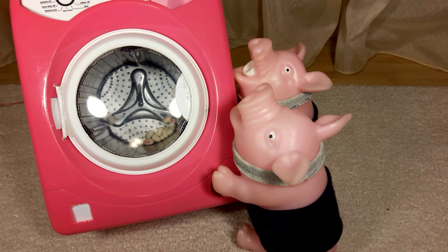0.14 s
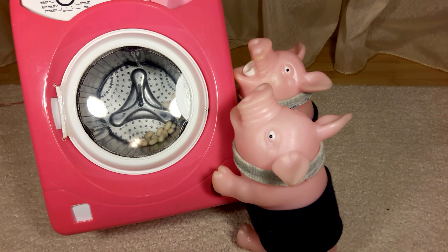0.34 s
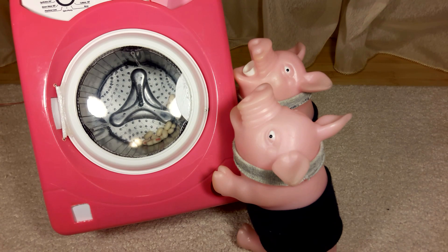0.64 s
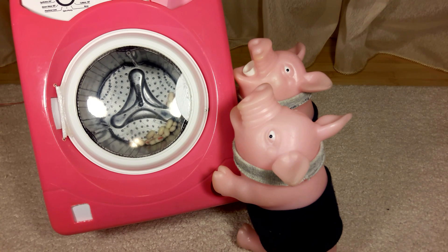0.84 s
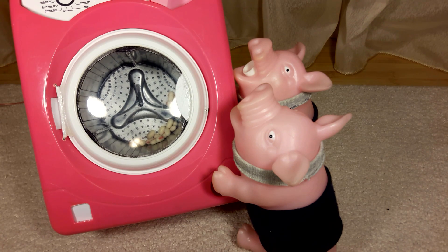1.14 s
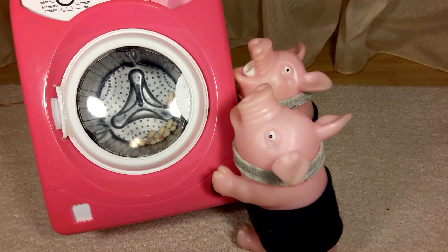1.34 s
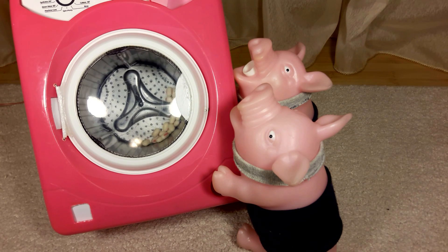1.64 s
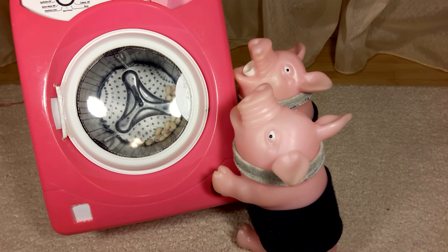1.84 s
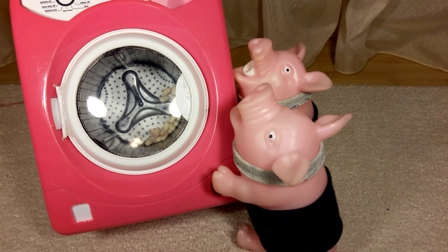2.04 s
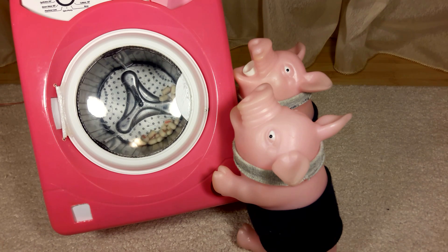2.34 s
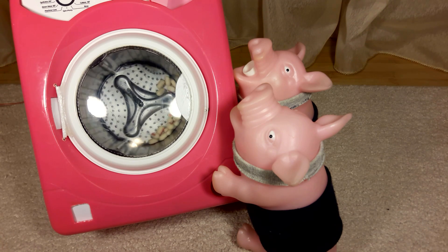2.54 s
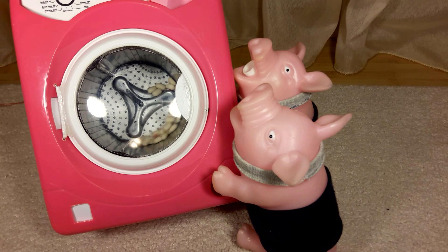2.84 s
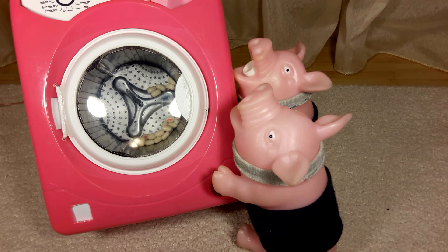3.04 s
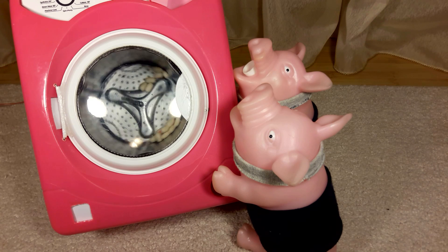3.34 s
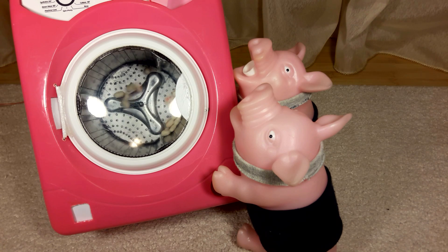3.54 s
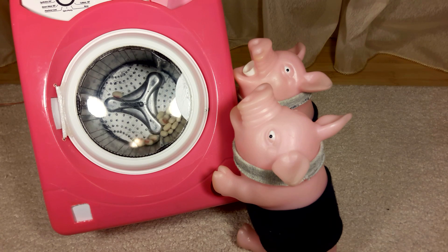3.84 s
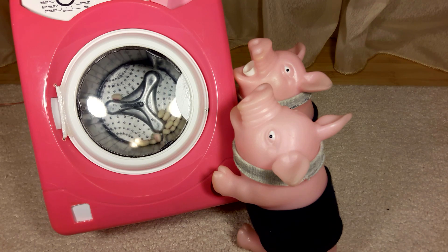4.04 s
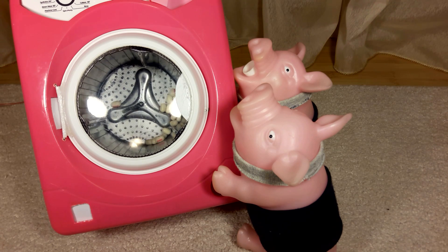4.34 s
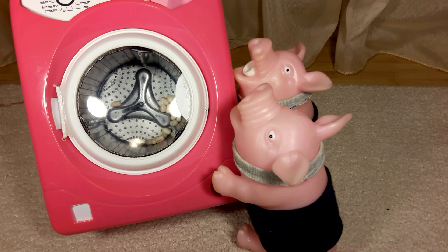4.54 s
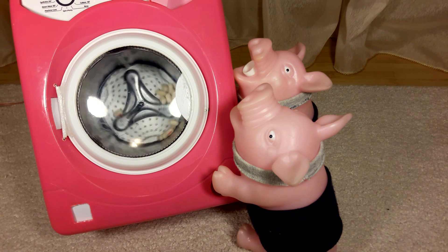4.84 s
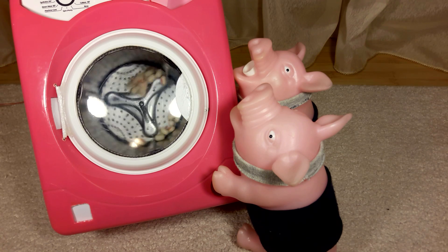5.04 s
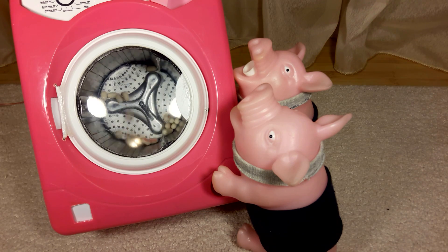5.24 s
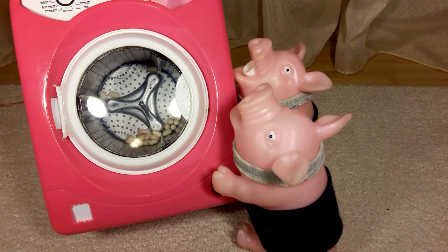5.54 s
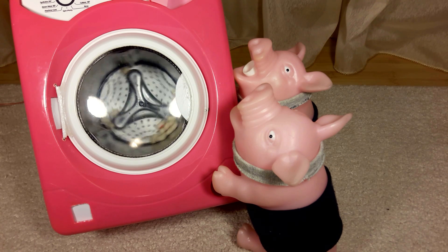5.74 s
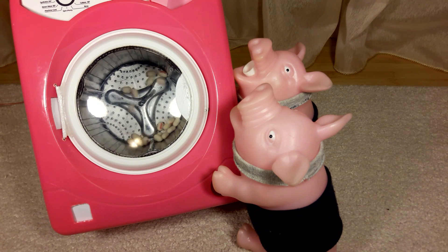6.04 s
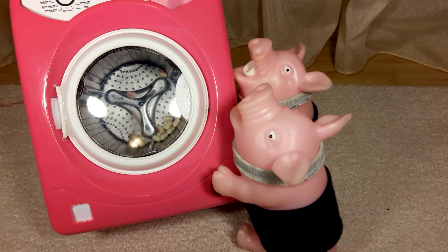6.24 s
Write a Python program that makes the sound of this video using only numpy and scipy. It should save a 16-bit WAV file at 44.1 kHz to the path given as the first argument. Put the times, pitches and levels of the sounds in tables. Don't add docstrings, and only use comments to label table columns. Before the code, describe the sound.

Small hard mints tumble in a hollow plastic toy drum, heard very close. It starts at once with a rattling burst, pauses with only faint ticks, gives two brief jerky clatters, then a longer, louder tumble that settles. After another pause come a fast, dense rattle and one more turn cut off at full strength. Dull housing knocks lie under bright clicks, over low room hum in a carpeted room.

```python
import sys
import numpy as np
from scipy import signal
from scipy.fft import rfft, irfft
from scipy.io import wavfile
from scipy.ndimage import uniform_filter1d

SR = 44100
rng = np.random.default_rng(int(sys.argv[2]) if len(sys.argv) > 2 else 0)


def bounce(signal):
    frames = np.transpose(np.atleast_2d(signal))
    limited = np.clip(frames, -1, 1)
    pcm = np.round(limited * 32767).astype(np.int16)
    wavfile.write(sys.argv[1], SR, pcm)


def gain_from_decibels(decibels):
    exponent = np.asarray(decibels, float) / 20
    return 10 ** exponent


N = 281799

# (frequency [Hz], density [dB per Hz])
HUM = [(40, -19), (52, -2.5), (65, -2), (90, -10), (140, -6), (280, -4.5), (400, -12), (700, -10.5),
       (1250, -12), (2500, -21.5), (7000, -34.5), (10000, -35.5), (13000, -27.5), (16000, -31)]
# (frequency [Hz], correlation [0-1])
HUM_SAME = [(40, .7), (130, .9), (300, .9), (600, .6), (1600, .15), (5000, 0)]
# (frequency [Hz], left minus right [dB])
HUM_LEAN = [(60, 4.5), (600, 2), (5000, 2), (15000, -1.5)]
HUM_DB, HUM_RISE_DB_PER_S = -55.5, 1
# (time [s], frequency [Hz], level [dB])
DRONE = [(0, 129.8, -73), (4.25, 131.1, -65.5), (4.319, 177, -59), (4.52, 177, -56), (4.6, 135, -66.5),
         (5.55, 130, -61), (5.7, 130.4, -60.5), (6.39, 128.4, -58.5)]
# (start [s], end [s], frequency [Hz], width [Hz], level [dB])
RUBS = [
    (0.003, 0.022, 2210, 90.1, -57),
    (2.72, 2.803, 2150, 60.2, -64),
    (3.368, 3.465, 325, 67.4, -49.5),
    (3.484, 3.568, 430, 39.7, -50.5),
    (5.182, 5.297, 8620, 59, -34),
]

# (time [s], blow [dB], share on the door [dB], share on the
# rim [dB])
LANDINGS = [(0.0404, -29.5, -7, -36), (0.0504, -10, -27.5, -20.5), (0.0654, -17, -10, -28.5),
            (0.0836, -20, -16.5, -37.5), (0.0918, -12.5, -21, -18.5), (0.107, -13, -24, -20.5),
            (0.1425, -8, -12, -13.5), (0.162, -17.5, -18.5, -20.9), (0.1679, -21, -14, -15.5),
            (0.2028, -5.5, -20, -23), (0.2257, -10, -8, -22.5), (0.262, -15, -19.5, -21.5),
            (0.2752, -15, -17.5, -25), (0.29, -17.5, -14.5, -15), (0.3154, -10.5, -20, -18),
            (0.33, -29.5, -5.5, -21), (0.3397, -13, -8, -15), (0.351, -13.5, -20.5, -18.5),
            (0.362, -12.5, -19.5, -26.5), (0.3785, -11.5, -13.5, -17), (0.394, -10.5, -33, -15),
            (0.4029, -8, -14.5, -20), (0.4148, -9, -13, -13), (0.4417, -12, -14.5, -22),
            (0.4495, -15, -6, -24), (0.4557, -13, -16.5, -24.7), (0.4744, -13.5, -4.5, -15.5),
            (0.5034, -17, -13, -20), (0.5191, -30, -9, -22.2), (0.5233, -17.5, -9, -19.6),
            (0.534, -25, -25, -23.9), (0.546, -23, -17, -25), (0.5539, -24, -8, -16),
            (0.5628, -28, -15, -16), (0.5769, -28, 1, -12), (0.5908, -17.5, -8, -21.5),
            (0.6185, -29, -23, -29.5), (0.634, -39.5, -6, -27),
            (1.698, -34.5, -18.5, -27), (1.9909, -29.5, -7.5, -20.6), (2.0044, -15.5, -13, -18.5),
               (2.0299, -12, -11, -22), (2.042, -29, -17, -23.5), (2.054, -50, -14.4, -19.5),
               (2.0622, -50, -13, -16), (2.0722, -15, -12.5, -18.5), (2.0894, -33, -9, -20.6),
               (2.123, -9, -7, -18), (2.141, -22, -19, -25.0), (2.1504, -15, -4, -23),
               (2.164, -24, -21, -21.1), (2.186, -8, -25, -19.5), (2.2008, -20, -17, -17),
               (2.212, -24, -9, -22.7), (2.2232, -22, -16.8, -26.1), (2.2547, -22, -12, -23),
               (2.2675, -24.3, -7, -27), (2.2839, -19.5, -6, -22.7), (2.8101, -10.5, -13.5, -20),
               (2.8345, -34, -4, -10), (2.8425, -11, -15, -15), (2.8633, -10.5, -10, -20),
               (2.8737, -15.5, -7, -11), (2.9202, -14.5, -4.5, -17), (2.9362, -8.5, -16, -17.5),
               (2.9642, -18.5, 0, -34), (2.9857, -29, -5, -25), (2.997, -21, -13.1, -24),
               (3.0099, -18, -18.7, -30), (3.0315, -19.5, -4, -33), (3.0603, -34, -13, -32),
               (3.068, -44, -16.1, -22),
            (3.5639, -22, -12, -24), (3.5916, -29, -3, -29), (3.5987, -30, -3, -25.3),
             (3.6074, -38, -1, -28), (3.6232, -38, -5, -31), (3.633, -17.5, -12, -16),
             (3.6553, -8, -24, -15.5), (3.6643, -16, -31, -21), (3.6797, -11.5, -9.5, -18),
             (3.7001, -9.5, -15, -13.5), (3.7136, -15, -5, -25), (3.7352, -3, -28, -19.5),
             (3.74, -10, -14, -23), (3.7597, -11, -10, -28), (3.767, -12.5, -27, -23),
             (3.7849, -5.5, -35, -16.5), (3.79, -9.5, -16, -19), (3.803, -5, -19, -19),
             (3.811, -8.5, -8.5, -22.5), (3.8232, -9.5, -24, -16), (3.846, -4, -24, -19.5),
             (3.8625, -13, -30, -22.5), (3.8723, -6.5, -31, -18), (3.8816, -8, -15, -16),
             (3.8918, -12, -12.6, -12), (3.902, -8, -31, -16.5), (3.9313, -10, -28, -20),
             (3.9412, -14.5, -26, -25), (3.9503, -22.5, -17, -17.5), (3.9554, -16.5, -30, -15),
             (3.9708, -16, -27, -28), (3.9818, -16, -15, -19), (3.9922, -22, -11, -15),
             (4.0052, -34, -17, -23.6), (4.0128, -22, -9, -26.6), (4.0315, -37, -10, -22.7),
            (4.058, -18.5, -10.5, -21.5), (4.0784, -18.5, -14, -24), (4.1135, -38, 1, -23.9),
            (4.1318, -33, -1, -16), (4.1445, -36, 2, -23), (4.1648, -15.5, -26.0, -28),
            (4.1972, -11, -26, -18.5), (4.229, -16, -29, -17), (4.2422, -23, -30, -22),
            (4.2639, -16, -16, -21), (4.441, -29.5, -3, -21.9), (4.4486, -33, -20, -29),
            (4.456, -37, -14, -25), (4.5543, -17.5, -14, -18.5), (4.5737, -44, -15, -22.5),
            (4.5913, -36, -22, -31.9), (4.6059, -31, -6, -31), (4.6134, -32.5, -6.5, -30),
            (4.956, -43, -8, -27.4), (4.9636, -20.5, -22, -25), (4.9717, -35, -17, -7),
             (4.9874, -18.5, -12, -22), (5.0007, -38, -14, -24.0), (5.015, -13.5, -10, -20),
             (5.0246, -12, -24, -16), (5.0352, -16.5, -9, -15), (5.0452, -14, -28, -20.7),
             (5.0586, -18, -24, -13), (5.0859, -12, -32, -26), (5.0979, -9.5, -35, -15.5),
             (5.1122, -14, -29, -17), (5.1264, -20, -14, -22), (5.1356, -25, -9, -25),
             (5.1477, -8, -22, -15.5), (5.1608, -12.5, -18, -9), (5.17, -9, -26, -27),
             (5.1876, -7, -18, -23), (5.2046, -11, -11, -7.5), (5.2444, -12, -9, -21),
             (5.2565, -7, -12, -13.5), (5.2699, -5, -20.5, -20), (5.2839, -37, -17, -23),
             (5.292, -10.5, -11.5, -19.5), (5.3029, -7, -22, -10), (5.3142, -5.5, -25.5, -21),
             (5.3239, -8.5, -19, -15), (5.3363, -9, -15, -14.5), (5.346, -6.5, -21, -15),
             (5.3572, -15, -23, -16), (5.3789, -2.5, -21, -21.5), (5.3989, -5.5, -18.5, -18),
             (5.4079, -15.5, -24, -20.4), (5.414, -20, -23, -6), (5.425, -16, -20, -15.5),
             (5.4311, -17.5, -13, -11), (5.451, -11.5, -25, -17.5), (5.467, -13.5, -14.5, -13),
             (5.4958, -5, -35, -16.5), (5.5181, -5, -33, -16.5), (5.5332, -11, -17.5, -18),
             (5.5437, -16.5, -3, -21), (5.5524, -28, -21, -22.6), (5.5636, -13, -24, -25),
             (5.5864, -9.5, -8.5, -22), (5.61, -24, -15, -21.5), (5.6173, -24, -18, -23.9),
             (5.6337, -17.5, -6.5, -25.4), (5.6546, -16.5, -10, -15),
            (5.9103, -27.5, -17, -24), (5.92, -29, -3, -20), (5.9446, -32, -1, -26.0),
             (5.9529, -31.5, -12, -19), (5.963, -21, -4, -21), (5.982, -16, -20, -28),
             (5.9945, -5.5, -24, -16), (6.0143, -10.5, -23, -21.4), (6.02, -11.5, -9.5, -17),
             (6.04, -6, -26, -16.5), (6.065, -6.5, -16, -15), (6.0778, -5.5, -25, -16.5),
             (6.0921, -12.5, -20, -11), (6.099, -10, -24, -18), (6.115, -10, -21, -22),
             (6.1246, -15, -13, -24), (6.1325, -13, -18, -18), (6.142, -18, -20, -16),
             (6.1468, -13, -23, -12.5), (6.1706, -15, -12, -13), (6.1778, -21, -11.1, -19.7),
             (6.1968, -20.5, -5, -13), (6.2108, -7, -7.5, -14), (6.2295, -10, -28, -19),
             (6.252, -3, -13, -19), (6.285, -5.5, -16, -14), (6.2944, -11.5, -15, -18.7),
             (6.3252, -11, -10, -17.5), (6.3479, -19.5, -11.9, -17.3), (6.3543, -28, -14, -19.2),
             (6.37, -16, -12, -11), (6.3756, -9, -10, -16.3)]
# (time [s], patter level [dB])
SLIDES = [
    [(0.0, -68), (0.045, -44), (0.06, -31.5), (0.19, -38), (0.31, -40), (0.33, -34), (0.5, -28),
     (0.64, -47.5), (0.68, -82)],
    [(1.99, -68), (2.06, -51), (2.12, -43), (2.2, -24.5), (2.3, -43), (2.35, -72)],
    [(2.81, -64), (2.86, -22.5), (2.9, -29), (2.95, -21.5), (3.02, -29), (3.11, -61.5)],
    [(3.5, -60), (3.56, -43.5), (3.62, -34), (3.73, -21), (3.8, -30), (3.88, -18), (3.95, -22.5),
     (4.01, -42), (4.045, -55)],
    [(4.046, -56), (4.09, -39), (4.15, -57), (4.21, -38), (4.28, -46.5), (4.35, -65)],
    [(4.52, -59), (4.57, -49), (4.65, -63)],
    [(4.87, -66.5), (5.06, -24.5), (5.2, -20.5), (5.35, -19.5), (5.372, -27), (5.39, -20.5), (5.54, -26),
     (5.67, -56), (5.72, -69)],
    [(5.87, -49.5), (5.93, -56), (6.01, -19.5), (6.15, -22), (6.2, -32.5), (6.26, -19.5), (6.36, -30),
     (6.385, -11)],
]
# (time [s], blow [dB], share on the rim [dB])
STRAYS = [
    (.1375, -12.5, -20),
    (.1982, -21, -24),
    (.7705, -57, -5),
    (1.1135, -54, -7),
    (1.861, -60, -6.5),
    (2.3565, -41, -26),
    (2.6305, -49, -26),
    (4.6683, -37, -24),
]
# (time [s], knock [dB], tick [dB])
KNOCKS = [(0.7696, -63, -1), (0.829, -47, -18), (1.1194, -61.5, -16), (1.1333, -51, -8), (1.1794, -57, -14),
          (1.5288, -58, -8), (1.5483, -51, -12), (1.6013, -47, -27), (1.863, -61.5, 1.5),
          (2.3944, -59.5, -7.5), (2.4196, -46, -18), (2.474, -48.5, -18), (2.505, -50, -18),
          (2.618, -47, -17), (3.2271, -49.5, -16.5), (3.2544, -46.5, -18.5), (3.3094, -49, -16),
          (3.376, -41.5, -22), (3.3984, -38, -19), (3.419, -52, -14), (3.5058, -52, -19), (3.5236, -54, 5),
          (4.7785, -46.5, -25), (4.7995, -49, -20), (4.8304, -50, -24), (4.8778, -47, -30),
          (4.8974, -39, -28), (4.9194, -38.5, -26), (5.77, -42.5, -18), (5.868, -44.5, -21)]

# (frequency [Hz], width [Hz], level [dB])
HOUSING = [(177, 35, -8.5), (284, 25, -4), (336, 45, -2), (430, 17, -7), (731, 140, -13), (1696, 72, -9.5)]
# (frequency [Hz], width [Hz], level [dB])
PANELS = [(555.2, 46.3, -5.5), (1197.6, 63.4, -4.5)]
# (time [s], side panel level [dB], top panel level [dB])
GRIP = [(0, -3, -14), (.2, 4, -0.5), (.6, -0.5, -9), (2.0, -2.5, -13.5), (2.2, -1, -3.5), (2.85, -2, -5),
        (3.05, 7.5, -3), (3.599, -7, -19), (3.81, 9, 7), (3.95, 1.5, 1.5), (4.5, -5, -7.5), (5.1, 2, -2),
        (5.16, 8, -13), (5.24, 2, -12), (5.29, 4.5, 5), (5.54, 3, -0.5), (6.0, 1.5, -7), (6.39, -3.5, -2)]
# (frequency [Hz], width [Hz], level [dB])
CAVITY = [(2151, 55, -3), (2198, 69, -3), (2516, 67, -16)]
# (frequency [Hz], width [Hz], level [dB])
WALL = [(2660, 46, -27), (2830, 34, 0.5), (3866, 66, 1.5), (4050, 93, -23), (4875, 120, 2.5), (5320, 85, 3),
        (6030, 120, -3), (6820, 110, -6)]
# (frequency [Hz], width [Hz], level [dB])
RIM = [(8300, 50, -5.5), (8620, 58, -5.5), (8880, 80, -6), (9950, 110, -5.5)]
# (frequency [Hz], width [Hz], level [dB])
AXLE = [(430, 17, -13), (727, 64, 0.5), (1140, 43, 4.5), (1645, 48, 1), (2160, 80, -2.5), (2810, 120, -2.5),
        (3250, 310, -10.5)]
# (frequency [Hz], density [dB per Hz])
CLATTER = [(800, -45.5), (1450, -33.5), (1900, -7), (2600, -8), (3800, 0.5), (5000, -5), (6300, -2.5),
           (7200, -11.5), (8800, -16.5), (9300, -23), (10200, -17.5), (13000, -19), (16000, -24)]
# (frequency [Hz], time to fall by 60 dB [s])
CLATTER_T60 = [(1500, 0.14), (2500, 0.15), (5000, 0.051), (9000, 0.051), (15000, 0.046)]
# (frequency [Hz], correlation [0-1])
SAME = [(100, .98), (400, .97), (1200, .7), (2500, .6), (5000, .1), (12000, 0)]
# (frequency [Hz], left minus right [dB])
LEAN = [(200, 0.5), (1000, 2.5), (2500, 2), (5000, 3), (7000, 2.5), (8600, -12), (10500, -2), (14000, -2)]

BOUNCES, SPOTS, SLIPS = 5, 6, 8
PATTER_PER_S = 600
THUD_DB, THUD_PER_BLOW, THUD_LIMIT_DB = -28.5, 0.37, -11.5
SLIDE_BRIGHT_DB, SLIDE_BRIGHT_PER_DB = -13, 0.25
SLIDE_THUD_DB, SLIDE_THUD_PER_DB = -10.5, -0.53
SPOT_COLOUR_DB = 2.5
BRIGHT_DB = 12.5


def evened(x):
    return x / np.sqrt(np.mean(x ** 2) + 1e-20)


def smoothed(x, size):
    return uniform_filter1d(uniform_filter1d(x, size=size), size=size)


def read(points, hz):
    f, value = np.transpose(points)
    return np.interp(np.log(hz + 1), np.log(f + 1), value)


def pair(a, b, same, lean_db):
    same = np.clip(same, -1, 1)
    right = same * a + np.sqrt(1 - same ** 2) * b
    return np.array([a * gain_from_decibels(lean_db / 2), right * gain_from_decibels(-lean_db / 2)])


def clicks(s, size):
    return np.bincount(np.clip(np.round(s * SR).astype(int), 0, N - 1), size, N)


def resonance(hz, width):
    r = np.exp(-np.pi * width / SR)
    return r, [1, -2 * r * np.cos(2 * np.pi * hz / SR), r * r]


def ring(s, size, modes, sharper, mode_db, through_frame=False):
    out = np.zeros((2, N))
    for hz, width, db in modes:
        a, b = rng.standard_normal((2, len(s)))
        a = np.sign(a) * np.sqrt(abs(a)) * 1.18
        r, poles = resonance(hz, width / sharper)
        blows = pair(a, b, read(SAME, hz), read(LEAN, hz)) * size * gain_from_decibels(db + mode_db) * width / 100
        trains = [clicks(s, v) for v in blows]
        rung = signal.lfilter([0, np.sin(2 * np.pi * hz / SR)], poles, trains)
        if through_frame:
            rung = signal.lfilter((1 - r * r) / 2 * np.array([1, 0, -1]), poles, rung)
        out += rung
    return out


def room(patchy_db=1.1):
    frames, hz = N // 256 + 5, np.fft.rfftfreq(1024, 1 / SR)
    a, b, c, d, patches = rng.standard_normal((frames, 513, 5)).T
    patches = uniform_filter1d(patches, size=14, axis=0)
    patches = evened(uniform_filter1d(patches, size=16, axis=1))
    z = pair(a + 1j * b, c + 1j * d, read(HUM_SAME, hz)[:, None], read(HUM_LEAN, hz)[:, None])
    z = z * gain_from_decibels(read(HUM, hz)[:, None] + patchy_db * patches)
    noise = evened(signal.istft(z, nperseg=1024, noverlap=768)[1][:, :N])
    level_db = HUM_DB + HUM_RISE_DB_PER_S * (np.arange(N) - N / 2) / SR
    return gain_from_decibels(level_db) * noise


def drone(unsteady=0.22):
    s, *columns = np.transpose(DRONE)
    hz, db = (np.interp(np.arange(N) / SR, s, c) for c in columns)
    waver = 1 + unsteady * evened(smoothed(rng.standard_normal(N), 2500))
    tone = np.sin(2 * np.pi * np.cumsum(hz) / SR)
    return np.sqrt(2) * gain_from_decibels(db + np.array([[.7], [-.7]])) * waver * tone


def rubs():
    out = np.zeros((2, N))
    for start, end, hz, width, db in RUBS:
        length = round((end - start) * SR)
        friction = rng.standard_normal(SR)[:length]
        tone = signal.lfilter([1], resonance(hz, width)[1], friction)
        tone = evened(tone) * gain_from_decibels(db) * signal.windows.tukey(length, .5)
        out[:, round(start * SR):][:, :length] += pair(tone, tone, 1, read(LEAN, hz))
    return out


def landings(handful_ms=6.5):
    rows = LANDINGS
    s, blow_db, cavity_db, bright_db = np.transpose(rows)
    housing_db = np.minimum(THUD_DB + (THUD_PER_BLOW - 1) * blow_db, THUD_LIMIT_DB)
    lag = rng.random((len(s), BOUNCES)) * (np.arange(BOUNCES) > 0)
    many = np.clip(1 + blow_db / 22, .05, 1)[:, None]
    share = np.where(lag > 0, 0.75 * many, 1) * (0.55 + 0.64 * rng.random(lag.shape))
    parts_db = np.array([housing_db + 6.5, cavity_db + 9.5, 0 * s, bright_db + BRIGHT_DB])
    sizes = gain_from_decibels(blow_db + parts_db - 8.5)[:, :, None] * share
    times = s[:, None] + lag * many * handful_ms / 1000
    return times.ravel(), sizes.reshape(4, -1)


def patter():
    t = np.sort(rng.random(round(PATTER_PER_S * N / SR))) * N / SR
    heap = np.full(len(t), -200.)
    for rows in SLIDES:
        u, db = np.transpose(rows)
        inside = (t >= u[0]) & (t <= u[-1])
        heap[inside] = np.interp(t[inside], u, db)
    heap_db = heap + 2.7 * np.minimum(rng.exponential(1, len(t)), 4) - 10.5
    thud_db = SLIDE_THUD_DB + SLIDE_THUD_PER_DB * (np.maximum(heap, -70) + 25)
    bright_db = 5 + SLIDE_BRIGHT_DB + SLIDE_BRIGHT_PER_DB * (heap + 25)
    return t, gain_from_decibels(heap_db + np.array([thud_db, 0 * t - 3, 0 * t, bright_db]))


def clatter(s, sizes, clatter_db=-4.0, rise_ms=0.76, crack=0.94, crack_ms=1.4):
    t, out = np.arange(4096) / SR, np.zeros((2, N))
    spot = rng.integers(0, SPOTS, len(s))
    hz, frame = np.fft.rfftfreq(128, 1 / SR), np.arange(4096 // 32 + 1) * 32 / SR
    fine = np.fft.rfftfreq(4096, 1 / SR)
    decay = gain_from_decibels(-60 * frame / read(CLATTER_T60, hz)[:, None])
    edges = [fine < 7300, fine >= 7300]
    for k in range(SPOTS):
        a, b = rfft(rng.standard_normal((2, 4096)))
        colour = gain_from_decibels(read(CLATTER, fine)) / np.sqrt(read(CLATTER_T60, fine) / .05)
        colour = colour * gain_from_decibels(SPOT_COLOUR_DB * evened(smoothed(rng.standard_normal(len(fine)), 50)))
        z = pair(a, b, read(SAME, fine), read(LEAN, fine)) * colour
        for edge, size in zip(edges, sizes[2:]):
            band = signal.stft(evened(irfft(z * edge)), nperseg=128, noverlap=96)[2]
            burst = signal.istft(band * decay, nperseg=128, noverlap=96)[1]
            burst = burst * (1 - np.exp(-t * 1000 / rise_ms))
            burst = burst * (1 + crack * np.exp(-t * 1000 / crack_ms))
            blows = clicks(s, size * (spot == k))[None]
            out += signal.oaconvolve(blows, burst, axes=1)[:, :N]
    return gain_from_decibels(clatter_db) * out


def strays():
    s, blow_db, bright_db = np.transpose(STRAYS)
    sizes = gain_from_decibels(blow_db - 9.0 + np.array([0 * s, 0 * s, 0 * s, bright_db + BRIGHT_DB]))
    return clatter(s, sizes) + ring(s, sizes[1], CAVITY, sharper=3.1, mode_db=1)


def axle():
    s, knock_db, tick_db = np.repeat(KNOCKS, SLIPS, axis=0).T
    s = s + .011 * rng.random(len(s)) ** 2
    tick = ring(s, gain_from_decibels(knock_db + tick_db), WALL[3:], sharper=0.45, mode_db=-7.0)
    return ring(s, gain_from_decibels(knock_db), AXLE, sharper=1.0, mode_db=-10.5) + tick


def drum(low_hz=130):
    landing_s, landing_sizes = landings()
    patter_s, patter_sizes = patter()
    s = np.r_[landing_s, patter_s]
    sizes = np.c_[landing_sizes, patter_sizes]
    out = ring(s, sizes[0], HOUSING, sharper=0.66, mode_db=9.5, through_frame=True)
    u, *free_db = np.transpose(GRIP)
    for panel, db in zip(PANELS, free_db):
        size = sizes[0] * gain_from_decibels(np.interp(s, u, db))
        out += ring(s, size, [panel], sharper=0.75, mode_db=10.0, through_frame=True)
    out += ring(s, sizes[1], CAVITY, sharper=2.1, mode_db=0.0)
    out += ring(s, sizes[2], WALL, sharper=0.93, mode_db=-6.5)
    out += ring(s, sizes[3], RIM, sharper=1.5, mode_db=-11.5)
    out += clatter(s, sizes) + axle()
    return signal.sosfilt(signal.butter(2, low_hz, "high", fs=SR, output="sos"), out)


def reflections(x, t60=0.18, wet_db=-16, dull_hz=9000):
    t = np.arange(SR // 3) / SR
    taps = rng.choice([-1., 1.], (2, len(t))) * (rng.random((2, len(t))) < .05) * (t > .004)
    taps = signal.lfilter([1], [1, -np.exp(-2 * np.pi * dull_hz / SR)], taps * gain_from_decibels(-60 * t / t60))
    return gain_from_decibels(wet_db) * signal.fftconvolve(x, taps / np.linalg.norm(taps[0]), axes=1)[:, :N]


def scene():
    toy = drum() + rubs()
    return toy + reflections(toy) + drone() + room() + strays()


def low_pass(x):
    return signal.sosfilt(signal.butter(12, 16510, fs=SR, output="sos"), x)


def record(dry):
    edge = signal.firwin(301, 15750, window=("kaiser", 7), fs=SR)
    driven = 1.351 * np.tanh(dry / 1.58)
    mix = signal.oaconvolve(driven, edge[None], "same", axes=1) * 1.29 - .001
    return low_pass(mix)


dry = scene()
out = record(dry)
bounce(out)
```